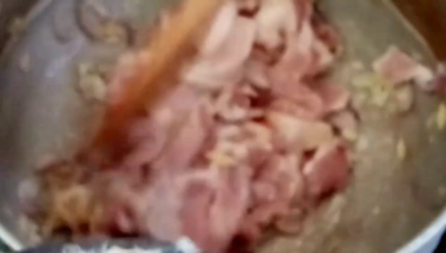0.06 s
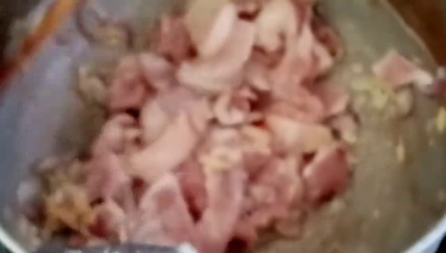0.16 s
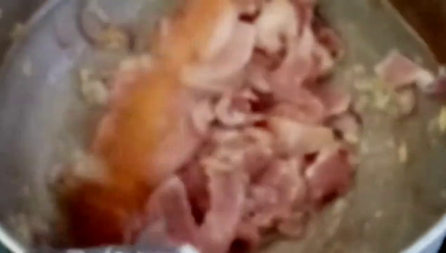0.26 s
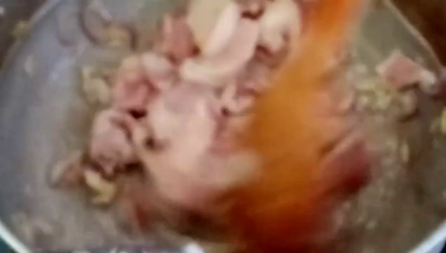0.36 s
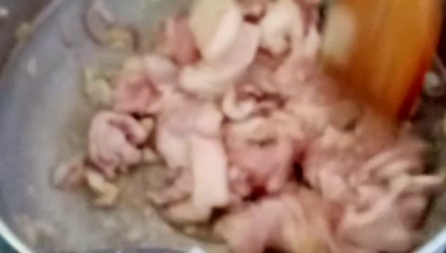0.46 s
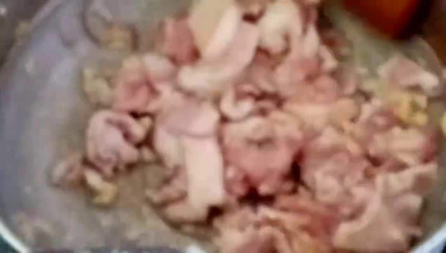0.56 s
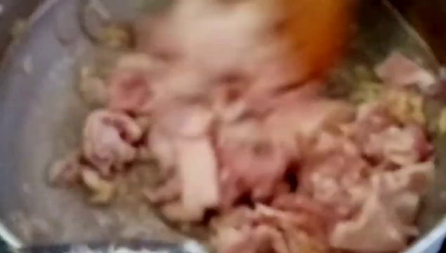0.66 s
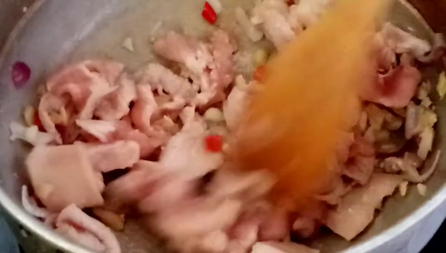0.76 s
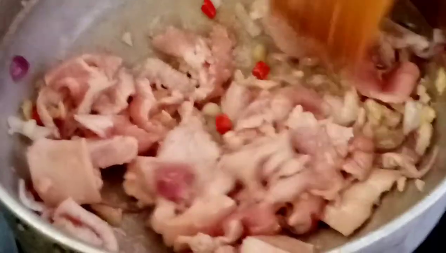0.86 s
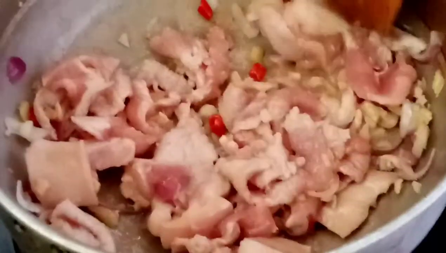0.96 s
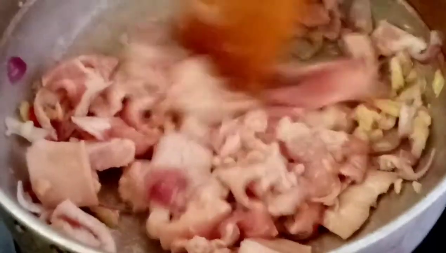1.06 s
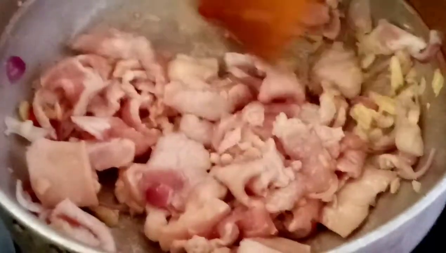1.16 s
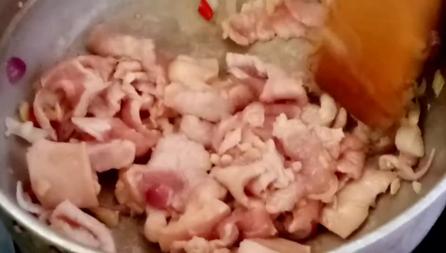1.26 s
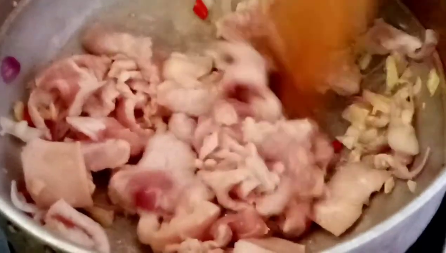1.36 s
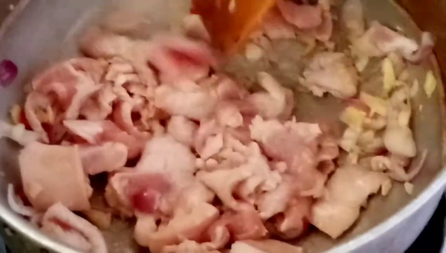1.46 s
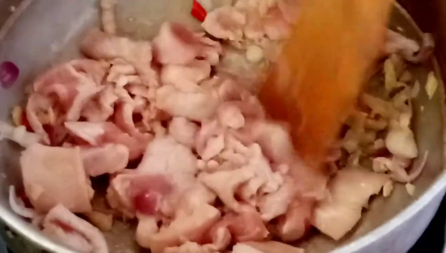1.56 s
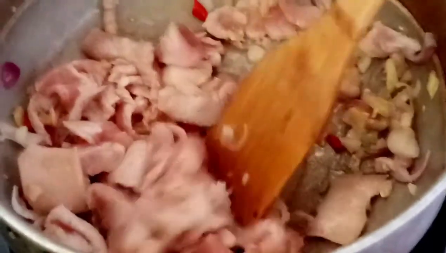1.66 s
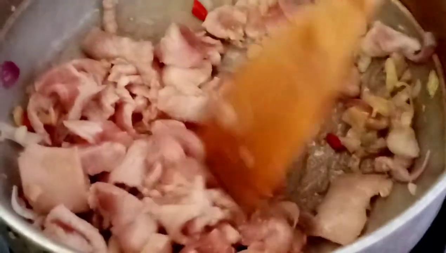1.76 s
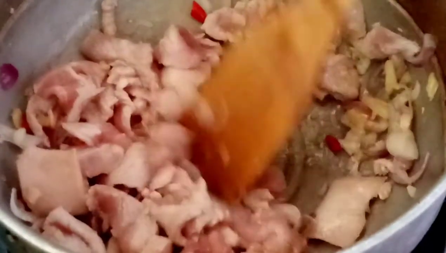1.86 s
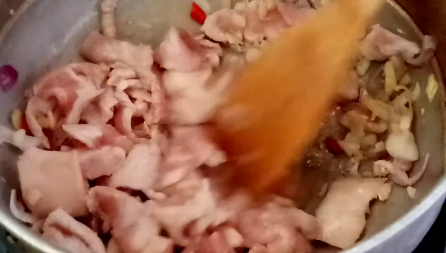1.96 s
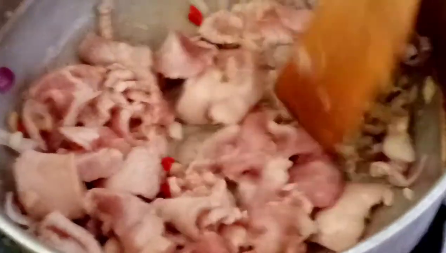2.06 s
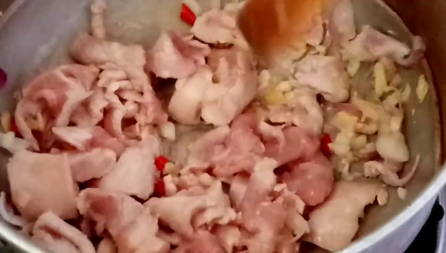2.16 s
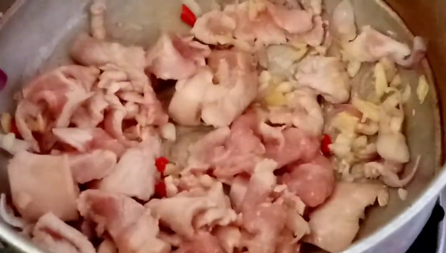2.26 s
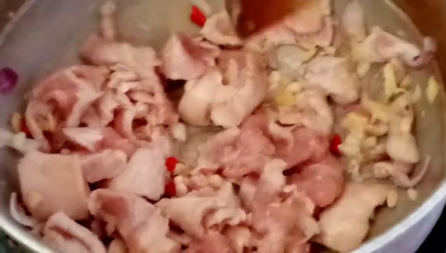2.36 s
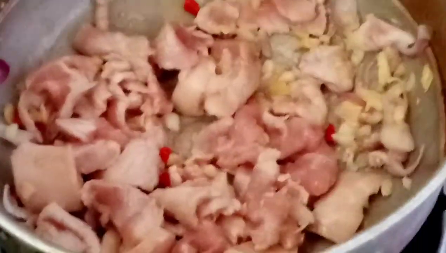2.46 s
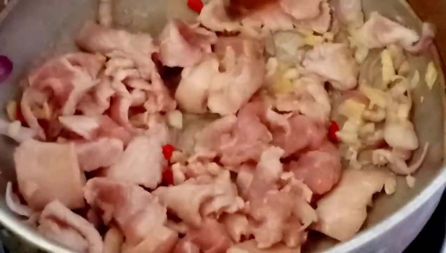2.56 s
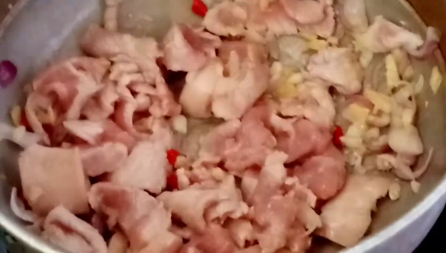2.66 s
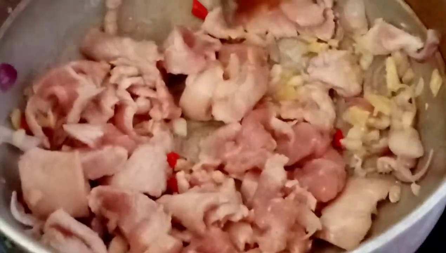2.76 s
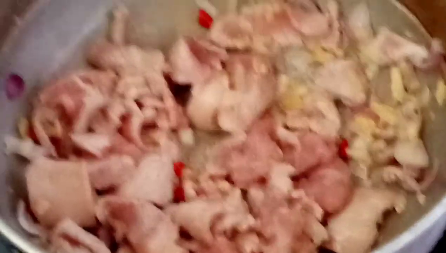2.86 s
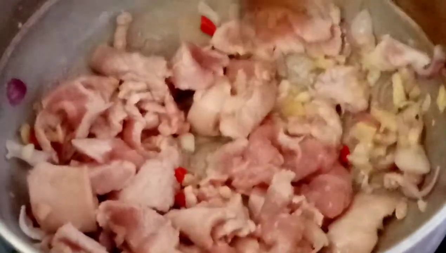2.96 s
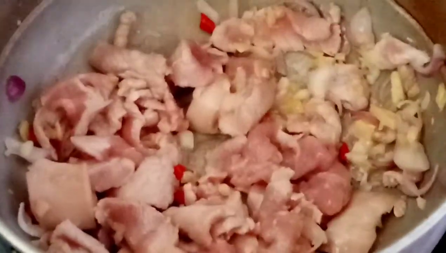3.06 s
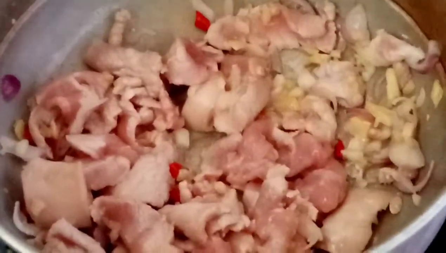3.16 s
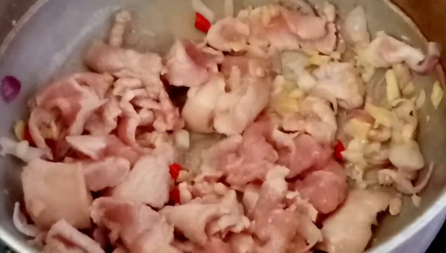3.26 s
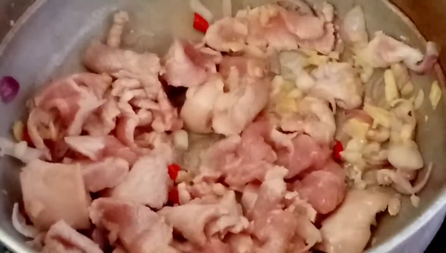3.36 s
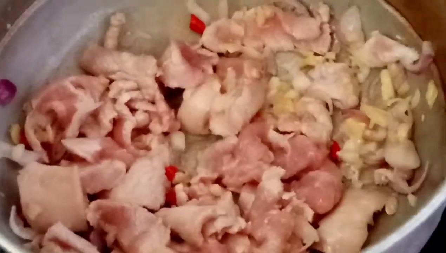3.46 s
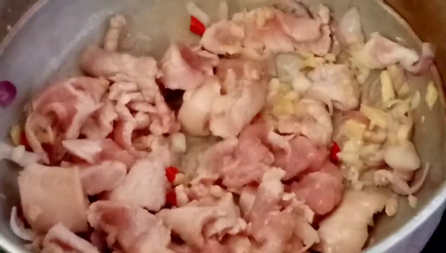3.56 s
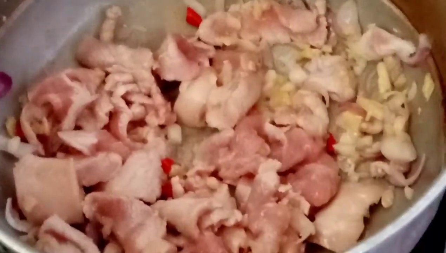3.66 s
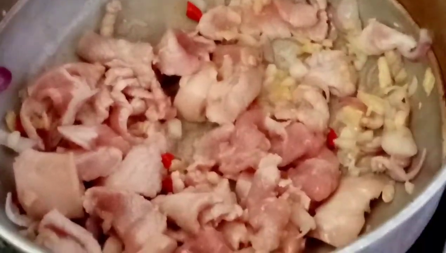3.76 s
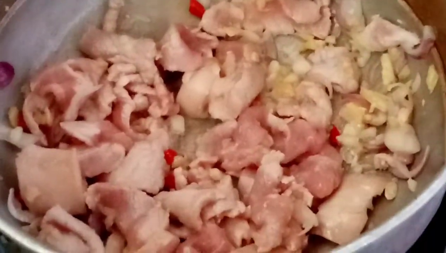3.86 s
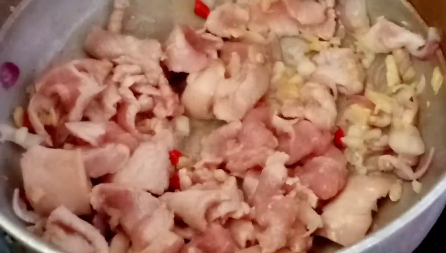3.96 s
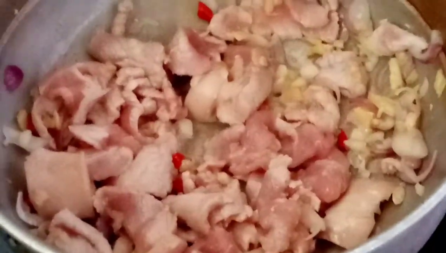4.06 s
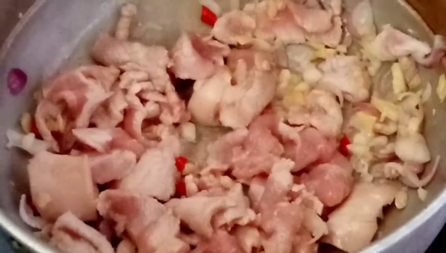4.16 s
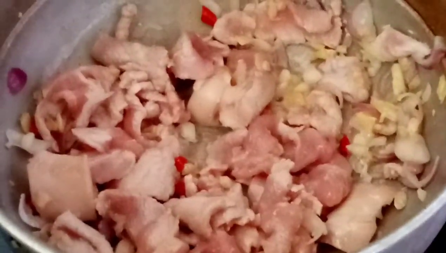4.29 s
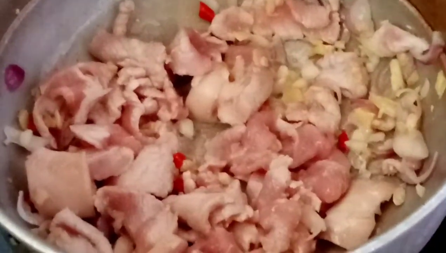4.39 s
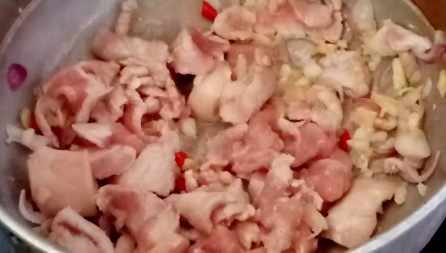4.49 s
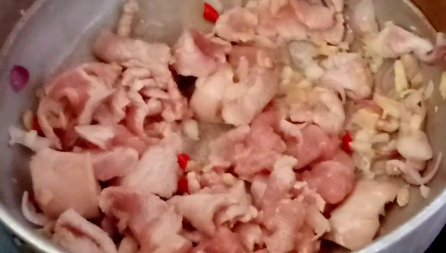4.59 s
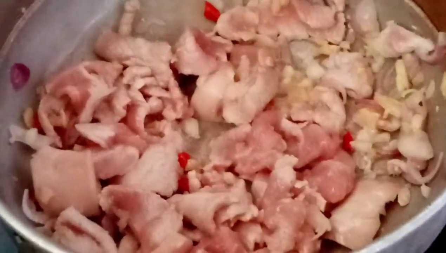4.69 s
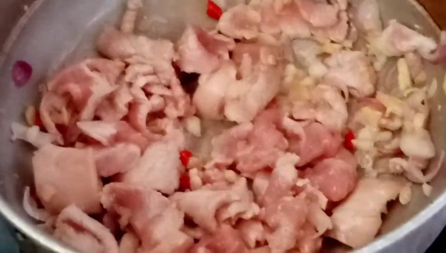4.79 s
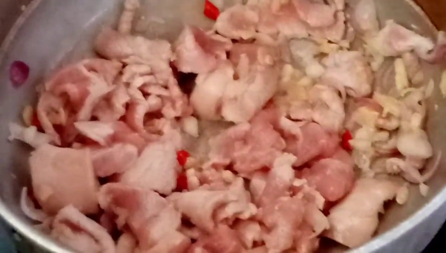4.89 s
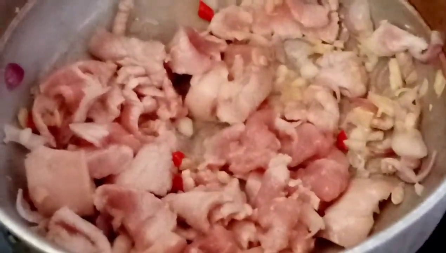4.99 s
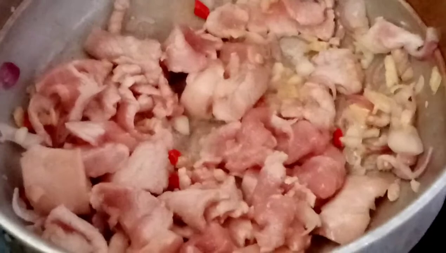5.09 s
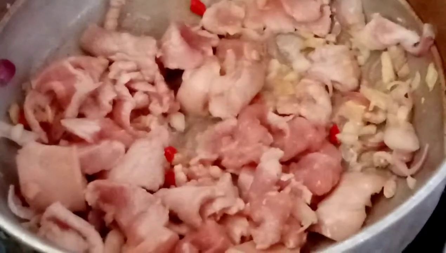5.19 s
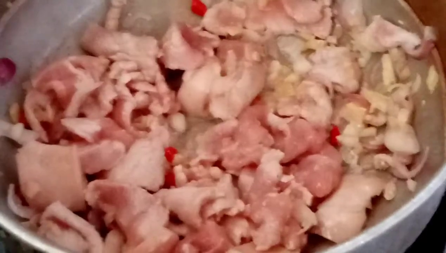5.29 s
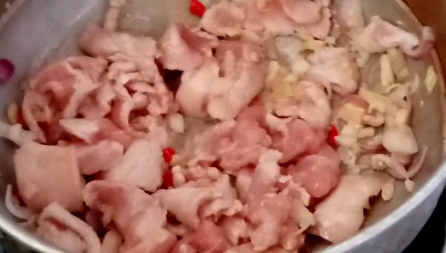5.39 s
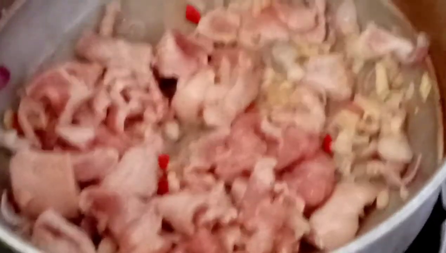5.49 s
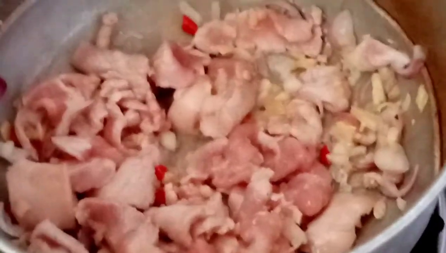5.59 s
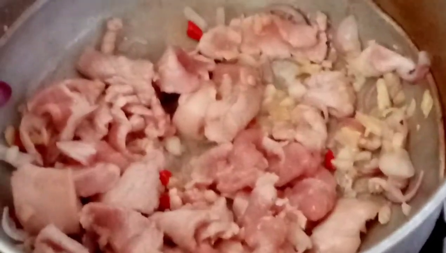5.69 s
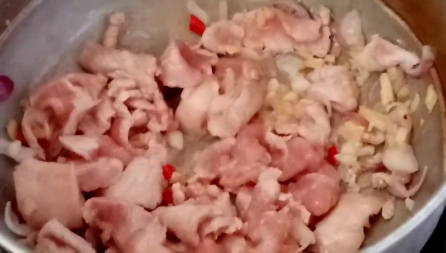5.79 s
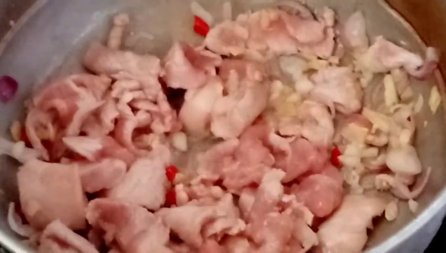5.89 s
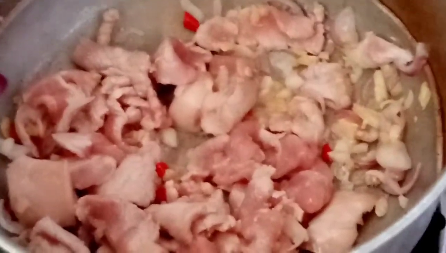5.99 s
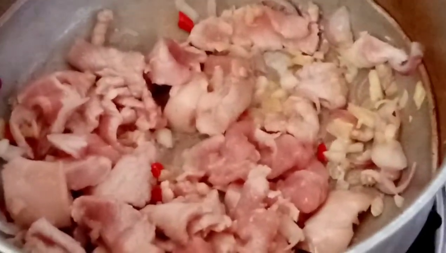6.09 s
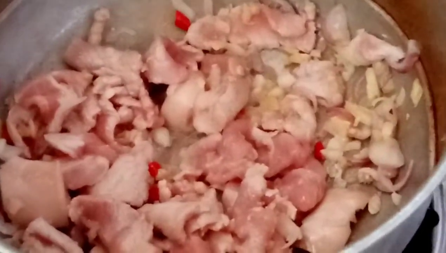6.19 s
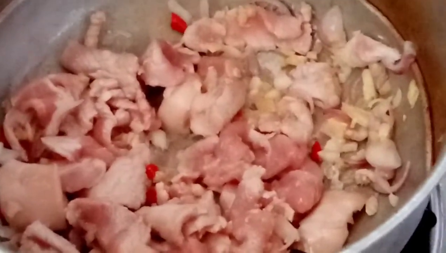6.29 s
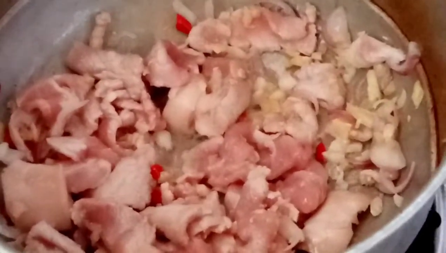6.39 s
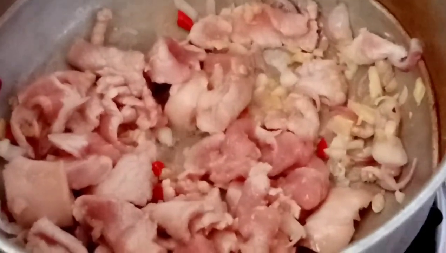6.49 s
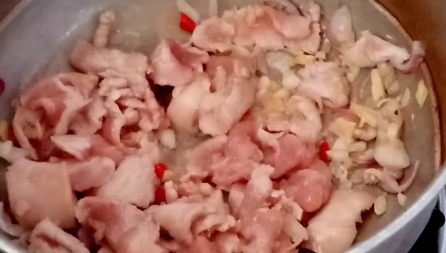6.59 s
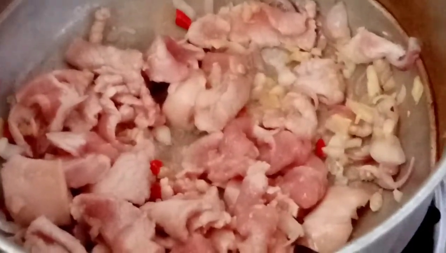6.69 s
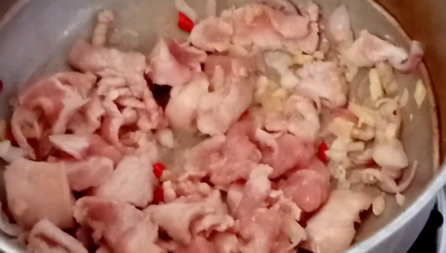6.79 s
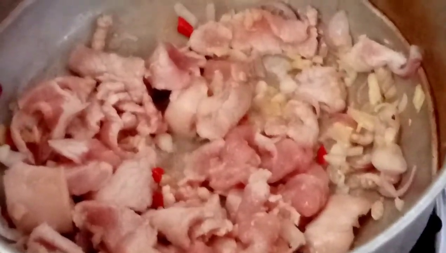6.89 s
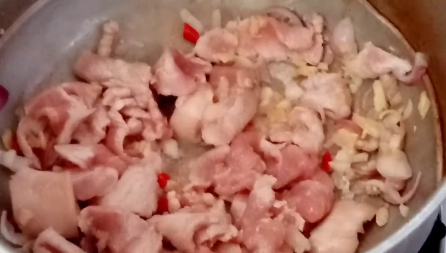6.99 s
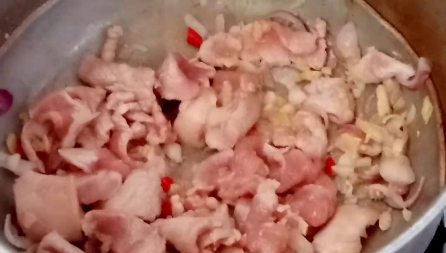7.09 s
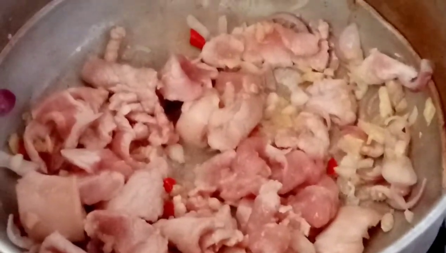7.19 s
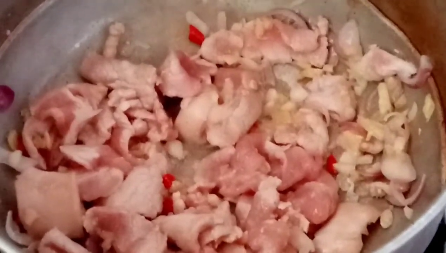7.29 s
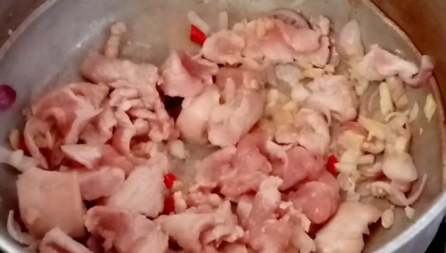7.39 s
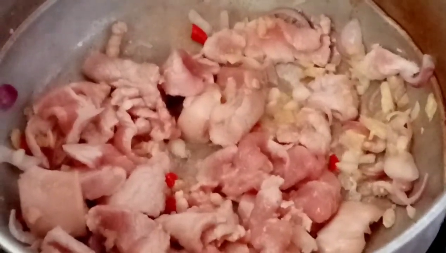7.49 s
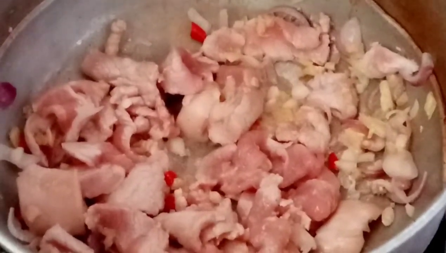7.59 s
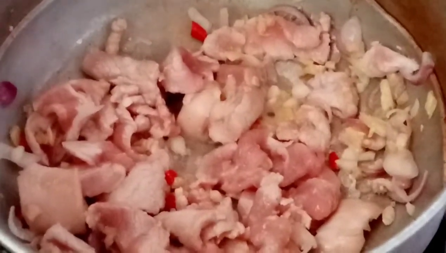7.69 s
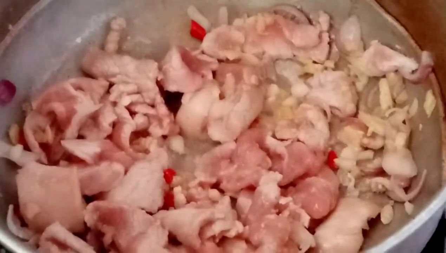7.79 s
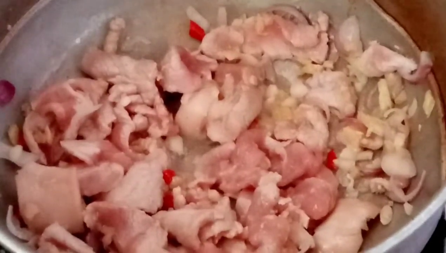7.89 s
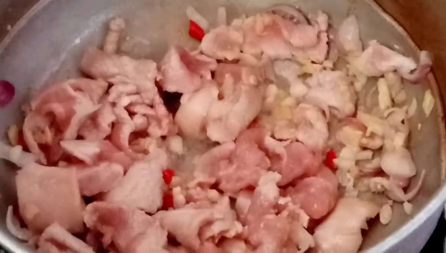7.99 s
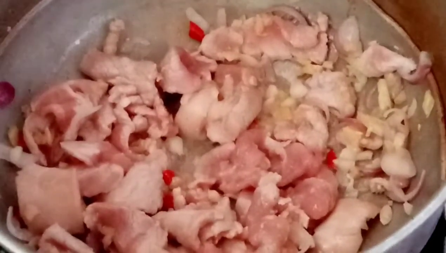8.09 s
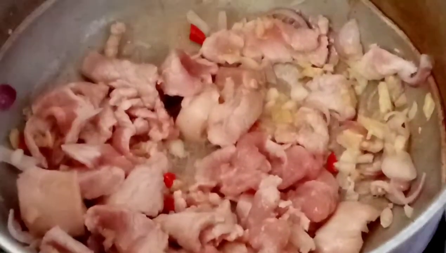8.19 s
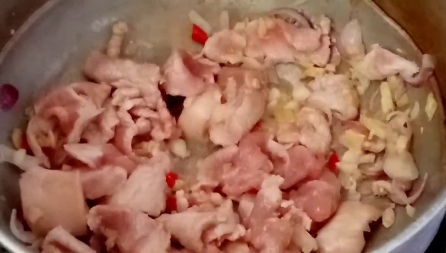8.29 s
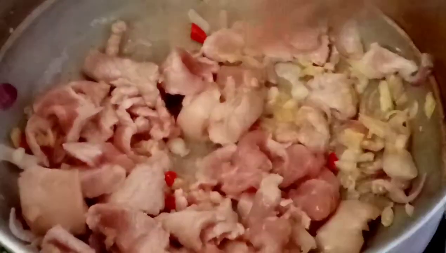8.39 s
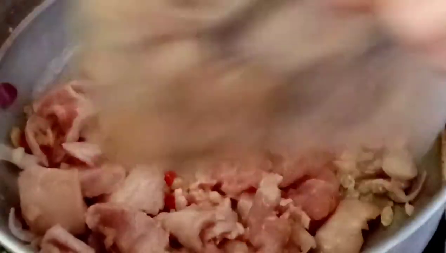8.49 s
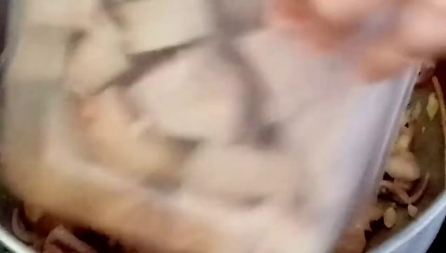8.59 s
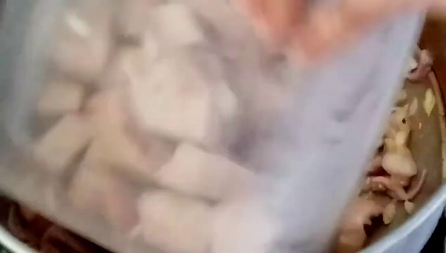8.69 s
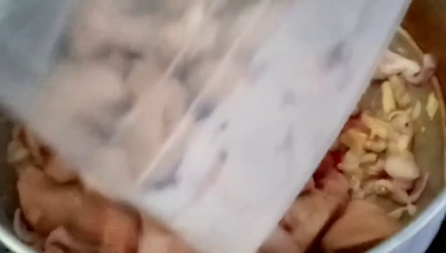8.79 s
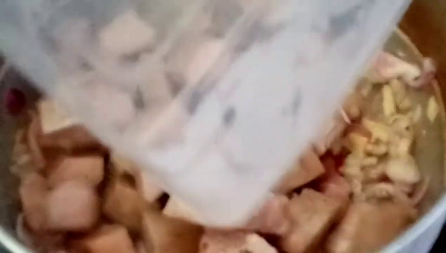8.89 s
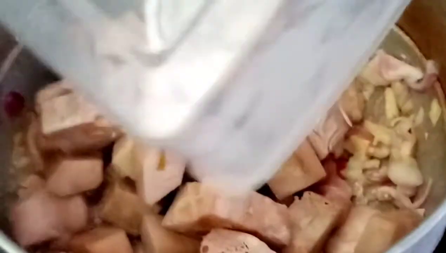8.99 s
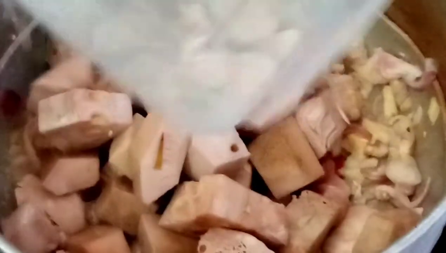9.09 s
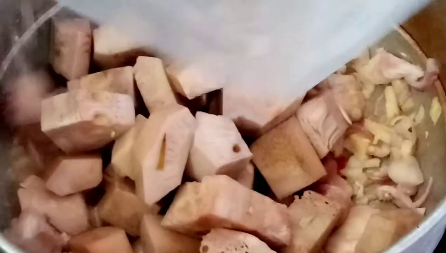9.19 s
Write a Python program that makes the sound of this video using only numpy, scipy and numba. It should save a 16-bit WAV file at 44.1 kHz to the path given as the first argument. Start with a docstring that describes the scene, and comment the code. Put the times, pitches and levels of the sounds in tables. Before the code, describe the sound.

Close to a metal pot in a home kitchen, frying is almost inaudible at first, then swells in as a wooden spatula knocks the rim four times. The spatula clatters down, and the narrow mono phone sound abruptly becomes wide, bright stereo. Steady sizzle continues over a low wavering hum, with spitting fat and dull bumps. Finally chunks of food tumble from a tub and the frying flares louder.

```python
"""A kitchen: meat sizzles in a metal pot under a hand-held phone, as hiss and random bubble bursts coloured by the pot.
A low drone and a wavering hum of beating tones lie below; a wooden spatula knocks the rim and is put down, as
ringing modes and noise. At the end more food tumbles in from a tub, as swells of low noise, and the fat flares up.
The phone starts narrow and mono, its steady background fading out and in and its bass shut except around blows;
then it switches to two wide-band microphones."""
import sys
import numpy as np
from scipy import signal
from scipy.fft import rfft, irfft
from scipy.io import wavfile
from scipy.ndimage import uniform_filter1d
from numba import njit

SR = 44100
rng = np.random.default_rng(int(sys.argv[2]) if len(sys.argv) > 2 else 0)


def store_pcm(level_fs):
    """Save levels as 16-bit WAV."""
    pcm = np.round(np.clip(level_fs, -1, 1) * 32767).astype(np.int16)
    wavfile.write(sys.argv[1], SR, np.atleast_2d(pcm).T)


N = 407925
SWITCH_S = 4.292  # narrow mono turns into two wide microphones
PORT_LAG_S = 43 / SR  # the right microphone hears the shared sound later


def undb(db):
    """Decibels to an amplitude factor."""
    return 10 ** (np.asarray(db) / 20)


def unit(x):
    """Scale to a standard deviation of 1."""
    return x / np.std(x)


def seconds(length_s):
    """Time axis of a short sound, in s."""
    return np.arange(int(length_s * SR)) / SR


def noise(count=N):
    """White noise."""
    return rng.standard_normal(count)


def curve(table):
    """Columns of (time, ..) rows, one value a sample."""
    s, *columns = np.transpose(table)
    return [np.interp(np.arange(N) / SR, s, column) for column in columns]


def across(table):
    """(frequency, value) points read at every bin of a spectrum of N samples."""
    hz, value = np.transpose(table)
    return np.interp(np.log(np.fft.rfftfreq(N, 1 / SR) + 1), np.log(hz), value)


def between(table):
    """True while a curve runs."""
    s = np.arange(N) / SR
    return (s >= table[0][0]) & (s < table[-1][0])


def after(times, rise_s, hold_s, fall_s):
    """0-1 envelope: rises at each time, holds, falls back."""
    s = np.arange(N) / SR
    corners = np.cumsum([0, rise_s, hold_s, fall_s])
    return np.max([np.interp(s - start, corners, [0, 1, 1, 0]) for start in times], axis=0)


@njit
def svf(x, hz, damp):
    """State-variable filter with a moving centre: band-pass and high-pass."""
    band_out, high_out = np.empty(len(x)), np.empty(len(x))
    band_state, low_state = 0., 0.
    for i in range(len(x)):
        g = np.tan(np.pi * hz[i] / SR)
        v = (band_state + g * (x[i] - low_state)) / (1 + g * (g + damp))
        low = low_state + g * v
        band_out[i] = damp * v
        high_out[i] = x[i] - damp * v - low
        band_state = 2 * v - band_state
        low_state = 2 * low - low_state
    return band_out, high_out


def band(x, hz, damp):
    """Band-pass at a fixed centre; more damping is broader."""
    return svf(x, np.full(len(x), 1. * hz), damp)[0]


def walk(rate):
    """Random values at `rate` a second, smoothed twice into a slow drift."""
    k = int(SR / rate)
    steps = np.repeat(noise(N // k + 1), k)
    return 1.306 * uniform_filter1d(uniform_filter1d(steps, k), k)[:N]


def add(out, s, sound):
    """Mix a sound in at s seconds."""
    i = int(s * SR)
    out[i:i + len(sound)] += sound[:N - i]


def fall(t, t60):
    """Exponential decay by 60 dB in t60 seconds."""
    return 10 ** (-3 * t / t60)


def ring(modes, t):
    """One blow on decaying modes, each with chance in level and pitch; peak 1."""
    chance = noise((len(modes), 2)) * [1.5, .008]  # dB, share of the pitch
    x = np.zeros(len(t))
    for k, (hz, db, t60) in enumerate(modes):
        level = (-1) ** k * undb(db + chance[k, 0])
        x += level * fall(t, t60) * np.sin(2 * np.pi * hz * (1 + chance[k, 1]) * t)
    return x / np.abs(x).max()


def tone(hz, db):
    """A tone that wavers in pitch and strength."""
    phase = 2 * np.pi * np.cumsum(hz + 4 * walk(16)) / SR
    return np.sqrt(2) * undb(db + 3.4 * walk(11)) * np.sin(phase)


# Path of the hum's upper tone: (time [s], frequency [Hz], relative level [dB])
HUM_PATH = [(4.3, 131, -62), (4.46, 131, -75), (4.69, 162, -60), (4.95, 122, -84), (5.13, 150, -65),
            (5.62, 122, -60.5), (5.73, 137, -56.5), (6.68, 139, -56), (6.81, 122, -53), (6.89, 134, -58),
            (7.1, 132, -59), (7.15, 142, -49), (7.76, 149, -51), (8.37, 130, -51), (8.73, 140, -43.5),
            (8.84, 146, -51), (9.14, 136, -51.5), (9.25, 148, -55)]
LOWER_HUM_HZ, LOWER_HUM_DB = 119, -68  # centre of its drift, relative level


def hum():
    """Two low tones that beat, in a blur of noise around the upper one."""
    hz, db = curve(HUM_PATH)
    blur = svf(noise(), hz, 0.6)[0]
    blur = unit(svf(blur, hz, 0.6)[0])
    upper = tone(hz, db)
    lower = tone(LOWER_HUM_HZ, LOWER_HUM_DB + 4.1 * walk(5.2))
    return upper + lower + undb(db - 6.5) * blur


# Dull bumps nearby: (time [s], level [dB], frequency [Hz], bass level [dB], rattle level [dB]),
# bass and rattle against the bump
THUDS_NEARBY = [(6.146, -30.5, 308, 1, -5.5), (6.764, -37, 357, -11, 4), (7.248, -29.5, 500, -13, -11),
                (8.665, -36, 292, 8, -16)]


def thuds():
    """Dull bumps: a bass mode and a body mode under a noisy rattle, softly started."""
    out, t = np.zeros(N), seconds(.25)
    for s, db, hz, low_db, rattle_db in THUDS_NEARBY:
        rattle = unit(band(noise(len(t)), 2.05 * hz, 1.0))
        rattle *= undb(rattle_db) * np.minimum(2.1 * fall(t, 0.26), 1)
        bass = undb(low_db) * ring([(132, 0, 0.18)], t)
        body = ring([(hz, 0, .12)], t)
        onset = np.minimum(t / 0.0037, 1)
        add(out, s, undb(db) * (bass + body + rattle) * onset)
    return out


# Spatula and tub clattering on something hard: (time [s], level [dB], brightness [dB per octave])
CLATTER = [(3.938, -10, -2), (3.955, -16, 1), (3.972, -19, 1.5), (4.024, -15, -3), (4.037, -17, -1),
           (8.44, -26, 11), (8.451, -17, 12)]
# Modes of the hard surface: (frequency [Hz], level [dB], decay t60 [s])
SURFACE_MODES = [(241, -10, 0.16), (985, -4, 0.042), (1290, -5, 0.03), (1440, -1, 0.029), (1660, -2, .03),
                 (1880, -0.5, 0.066), (2730, -5, 0.027)]


def clacks():
    """Each contact chatters for a few ms, so the modes start raggedly."""
    out, t = np.zeros(N), seconds(.3)
    for s, db, tilt_db in CLATTER:
        modes = [(hz, d + tilt_db * np.log2(hz / 1400), t60) for hz, d, t60 in SURFACE_MODES]
        hit = ring(modes, t)
        first = t[:512] == 0
        chatter = (rng.random(512) < .05) * 0.32 * fall(t[:512], 0.024) + first
        sound = signal.fftconvolve(hit, chatter)[:len(t)]
        rasp = band(noise(len(t)), 1500 * 2 ** (0.11 * tilt_db), 0.79)
        tail = undb(-6.5) * fall(t, 0.21) * rasp
        add(out, s, undb(db) * (sound / np.abs(sound).max() + tail))
    return out


# Loads of food dropping in: (time [s], level [dB], length scale [s])
FOOD_LOADS = [(8.36, -27.5, 0.23), (8.585, -36.5, 0.13), (8.733, -41.5, .08)]


def tumble():
    """Chunks of food landing on the meat: unsteady noise through three low bands."""
    rough = noise() * undb(1.2 * walk(65))
    chunks = band(rough, 440, 0.091)
    chunks += undb(-5.5) * band(rough, 290, 0.47)
    chunks += undb(-16) * band(rough, 126, 0.42)
    level = np.zeros(N)
    for s, db, length in FOOD_LOADS:
        # each load swells, holds a little and falls back more slowly
        level += undb(db) * after([s], 0.46 * length, 0.28 * length, 0.9 * length) ** 2
    return unit(chunks) * level


# Single spits of fat: (time [s], level [dB])
FAT_SPITS = [(3.197, -21.5), (3.404, -19), (4.831, -21.5), (5.576, -22), (5.8306, -31), (7.207, -16),
             (8.2127, -24), (8.627, -20.5), (8.7215, -19), (8.928, -28), (9.1835, -22)]


def pops():
    """Bright, very short spits of noise."""
    out, t = np.zeros(N), seconds(.03)
    for s, db in FAT_SPITS:
        add(out, s, undb(db) * fall(t, 0.023) * unit(band(noise(len(t)), 6200, 0.3)))
    return out


# Spatula on the rim: (time [s], blow level [dB], rumble level [dB], tail level [dB]),
# rumble and tail against the blow
RIM_KNOCKS = [(0.374, -54.5, -38, 4.5), (0.766, -58, -22, 6.5), (1.104, -66.5, -23, -9),
              (2.158, -14.5, -10, -13.5), (2.361, -12, -9, -11), (2.555, -10, -10.5, -12.5),
              (2.786, -10, -10, -10.5)]
# Modes of the metal pot: (frequency [Hz], level [dB], decay t60 [s])
POT_MODES = [(321, -3, 0.18), (455, -0.5, 0.031), (615, -3.5, 0.12), (883, -1.5, 0.064), (1149.4, 1, 0.088),
             (1718, -10, 0.11), (1854, -18, .1), (2190, -13.5, 0.27), (2816, -13, 0.18),
             (3160, -5.5, 0.074), (3750, -17, 0.05), (5920, -3, 0.037)]


def knocks():
    """Crack, ring, a bright kitchen tail, and a low rumble that swells as the phone lets the bass through."""
    out, t = np.zeros(N), seconds(.45)
    swell = (t / 0.06 * np.exp(1 - t / 0.054)) ** 1.46
    for s, db, rumble_db, tail_db in RIM_KNOCKS:
        crack = undb(1.5) * fall(t, 0.091) * noise(len(t))
        tail = undb(tail_db) * fall(t, 0.42) * unit(band(noise(len(t)), 3100, 1.8))
        rough = noise(len(t))
        rumble = sum(undb(d) * band(rough, hz, 0.13) for hz, d, _ in POT_MODES[:3])
        rumble += undb(-6) * band(rough, 185, 0.91) + undb(-10) * band(rough, 95, 1.0)
        blow = undb(3.5) * ring(POT_MODES, t) + crack + tail
        add(out, s, undb(db) * blow + undb(db + rumble_db) * swell * unit(rumble))
    return out


# Spatula dragged over the bottom till it catches: (time [s], level [dB])
BOTTOM_SCRAPE = [(0, -75.5), (.27, -64.5), (.372, -63), (.378, -44.5), (.5, -78)]


def scrape():
    """Wood dragged over metal: rough noise in a narrow bright band."""
    drag = noise() * undb(2.0 * walk(49))
    drag = unit(band(band(drag, 2600, 0.31), 2650, 0.66))
    return between(BOTTOM_SCRAPE) * undb(curve(BOTTOM_SCRAPE)[0]) * drag


def bubbles(per_s=2500, spread_db=2.5, crackle_db=-8):
    """Spectrum of steam hiss plus random bubble bursts, each smeared by the pot walls over a few ms."""
    strength = undb(spread_db * np.minimum(rng.exponential(size=N), 3.5))
    bursts = (rng.random(N) < per_s / SR) * noise() * strength
    smear = rfft(noise(512) * fall(np.arange(512) / SR, 0.0049), N)
    smear /= np.abs(smear)  # moves energy in time, leaves the colour
    return rfft(noise()) + undb(crackle_db) * rfft(unit(bursts)) * smear


# Colour of drone and frying: (frequency [Hz], relative level per Hz [dB])
STEADY_COLOUR = [(45, -19), (80, -13.5), (200, -13.5), (300, -15), (600, -9), (900, -12), (1450, -10.5),
                 (1900, -5.5), (3500, -4.5), (5500, -2.5), (6600, 2), (7600, -0.5), (8700, -12.5),
                 (11000, -20), (13700, -26.5), (14500, -20.5)]
# Right microphone against the left: (frequency [Hz], level [dB])
RIGHT_COLOUR = [(60, -11.5), (300, -9), (800, -11), (1800, -9), (2600, -4), (4800, -10), (6500, -10),
                (8300, 4.5), (11000, -0.5), (15000, 6.5)]
# How much the microphones share: (frequency [Hz], likeness [0-1, clipped])
LIKENESS = [(40, 0.2), (140, 1), (450, 0.34), (680, 0.16), (1050, 0.73), (2200, 0.01), (4000, 0.07)]


def drone_and_sizzle():
    """Low kitchen drone and bright frying at both ports, apart; the frying flickers as patches of fat boil up."""
    hz = np.fft.rfftfreq(N, 1 / SR)
    alike, common = np.clip(across(LIKENESS), 0, 1), bubbles()
    late = np.exp(-2j * np.pi * hz * PORT_LAG_S)
    left = np.sqrt(alike) * common + np.sqrt(1 - alike) * bubbles()
    right = np.sqrt(alike) * common * late + np.sqrt(1 - alike) * bubbles()
    right *= undb(across(RIGHT_COLOUR))
    wall = np.ones(len(hz))  # the pot wall rings faintly along
    for mode_hz, db, _ in POT_MODES[:9]:
        wall += undb(min(db, -6) + 10.5) / (1 + ((hz - mode_hz) / (0.0089 * mode_hz)) ** 2)
    ports = np.array([left, right]) * undb(across(STEADY_COLOUR)) * wall
    boil, drone, frying = walk(5), 0, 0
    for centre in np.arange(5, 15):  # log2 of the octave's middle in Hz
        share = np.clip(1 - np.abs(np.log2(hz + 1) - centre), 0, 1)
        octave = irfft(ports * share, N)
        if centre < 10:
            drone = drone + octave * undb(1.8 * walk(9))
        else:
            frying = frying + octave * undb(0.12 * boil + 0.76 * walk(12))
    return np.array([drone, frying]) / np.std(frying[0])


# How far the tub covers the pot: (time [s], share [0-1])
TUB_COVER = [(8.4, 0), (8.5, 1), (8.75, .6), (9.0, .1), (9.25, 0)]
RING_HZ, RING_DROP_HZ = 1150, 95  # air ring of the open pot, and how far the tub lowers it
RING_DB, RING_NARROW_DB = 5.5, 1  # against the frying: wide (pot open, no flare), narrow
RING_COVER_DB, RING_PER_DB = 4.5, -0.26  # change under the full tub, and per dB of flare


def air_ring(frying, wide, cover, flare_db):
    """The air in the pot rings with the frying; the tub lowers its pitch and strengthens it."""
    wide_db = RING_DB + RING_COVER_DB * cover + RING_PER_DB * flare_db
    ring_db = np.where(wide, wide_db, RING_NARROW_DB)
    rings = [svf(port, RING_HZ - RING_DROP_HZ * cover + 12 * walk(20), 0.11)[0] for port in frying]
    return undb(ring_db) * np.array(rings)


# Steady background while narrow, before the dips at the knocks: (time [s], frying level [dB])
NARROW_BACKGROUND = [(0, -67.5), (.2, -67), (.38, -59.5), (.55, -58.5), (.76, -59), (.9, -65), (1.13, -81),
                     (1.5, -73.5), (1.71, -59), (2.15, -33), (2.33, -29.5), (3.02, -29.5), (4.16, -28.5),
                     (4.285, -35)]
# Frying once wide; the tub shades it, then the fat flares: (time [s], level [dB])
WIDE_FRYING = [(4.29, -25.5), (8.28, -26.5), (8.38, -28.5), (8.45, -26.5), (8.54, -25), (8.57, -21),
               (8.68, -17.5), (8.994, -20), (9.25, -19.5)]
# The phone turns a little: right-microphone level of the frying: (time [s], level [dB])
PHONE_TURN = [(4.29, -1), (4.6, 0), (8.7, 1.5), (9.25, 0)]
# the narrow sound's steady background is turned down into each knock, then creeps back
DIP_DB, DIP_FALL_S, DIP_BACK_S = -8, 0.021, 0.097


def scene():
    """Both microphone ports: drone, frying with its air ring, and everything else on top."""
    wide = np.arange(N) >= SWITCH_S * SR
    late_db, cover = curve(WIDE_FRYING)[0], curve(TUB_COVER)[0]
    dip = after([knock[0] - DIP_FALL_S for knock in RIM_KNOCKS], DIP_FALL_S, 0, DIP_BACK_S)
    early_db = curve(NARROW_BACKGROUND)[0] + DIP_DB * dip
    flare_db = late_db - WIDE_FRYING[0][1]
    drone, steady = drone_and_sizzle()
    steady = steady + air_ring(steady, wide, cover, flare_db)
    steady[1] *= undb(curve(PHONE_TURN)[0])
    steady *= undb(np.where(wide, late_db, early_db))
    # the low kitchen drone hardly follows the flare; while narrow, it and the hum share the fades
    steady += drone * undb(np.where(wide, -28.5 + 0.22 * flare_db, early_db - 6.5))
    hum_db = np.where(wide, 3.5, np.minimum(early_db + 31, 8))
    near = hum() * undb(hum_db) + thuds() + clacks() + tumble() + pops() + knocks() + scrape()
    near_right = undb(-8.0) * np.roll(near, round(PORT_LAG_S * SR))
    return steady + np.array([near, near_right])


# Colour while narrow: (frequency [Hz], level [dB])
NARROW_COLOUR = [(300, -4), (600, -1.5), (800, -7), (1150, 1.5), (1500, -5), (2500, 0.5), (4000, -4.5),
                 (5500, -9), (6500, -17.5), (6900, -28.5)]
NARROW_TOP_HZ, TOP_HZ = 6900, 15520  # treble limits: narrow, and the whole output
CUT_SHUT_HZ, CUT_OPEN_HZ = 470, 255  # edge of the bass cut while narrow
OPEN_S, HOLD_S, CLOSE_S = 0.11, 0.041, 0.28  # how the cut moves after a blow
LEAK_SHUT_DB, LEAK_OPEN_DB, LEAK_BLUR_S = -56.5, -14.5, .5  # bass slipping past the cut near blows
BRIEF_DIP_S = 1.045, 1.103  # the narrow sound drops to 12 % for a moment


def record(dry):
    """Narrow mono with a moving bass cut, then both ports wide open."""
    s = np.arange(N) / SR
    heard = dry[0] * (s < SWITCH_S + .1)
    mono = irfft(rfft(heard) * undb(across(NARROW_COLOUR)), N)
    opened = after([blow[0] for blow in RIM_KNOCKS + CLATTER], OPEN_S, HOLD_S, CLOSE_S)
    around = np.clip(3.3 * uniform_filter1d(opened, int(LEAK_BLUR_S * SR)), 0, 1)
    leak_db = LEAK_SHUT_DB + (LEAK_OPEN_DB - LEAK_SHUT_DB) * around
    edge_hz = CUT_SHUT_HZ * (CUT_OPEN_HZ / CUT_SHUT_HZ) ** opened
    cut = mono
    for _ in range(3):
        cut = svf(cut + 1e-18, edge_hz, 1.52)[1]  # the tiny offset keeps the filter fast in silence
    mono = cut + undb(leak_db) * band(mono, 160, 0.67)
    outside_s = np.maximum(BRIEF_DIP_S[0] - s, s - BRIEF_DIP_S[1])
    mono *= np.clip(outside_s / .004 + 1, .12, 1)
    mono = signal.sosfilt(signal.ellip(10, .3, 80, NARROW_TOP_HZ, fs=SR, output="sos"), mono)
    both = signal.sosfilt(signal.butter(2, 70, "high", fs=SR, output="sos"), dry)
    out = np.where(np.arange(N) >= SWITCH_S * SR, both, mono)
    return signal.sosfilt(signal.ellip(10, .2, 80, TOP_HZ, fs=SR, output="sos"), out)


dry = scene()
out = record(dry)
store_pcm(out)
```